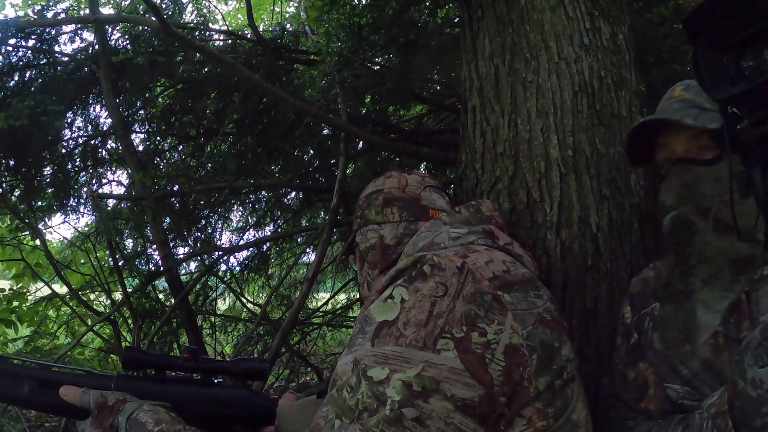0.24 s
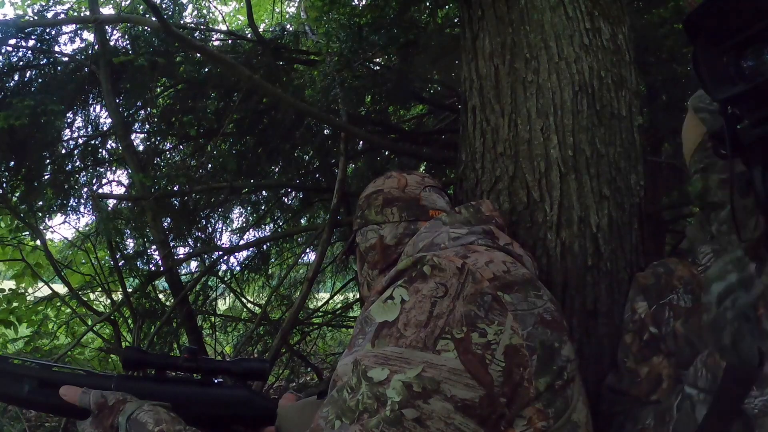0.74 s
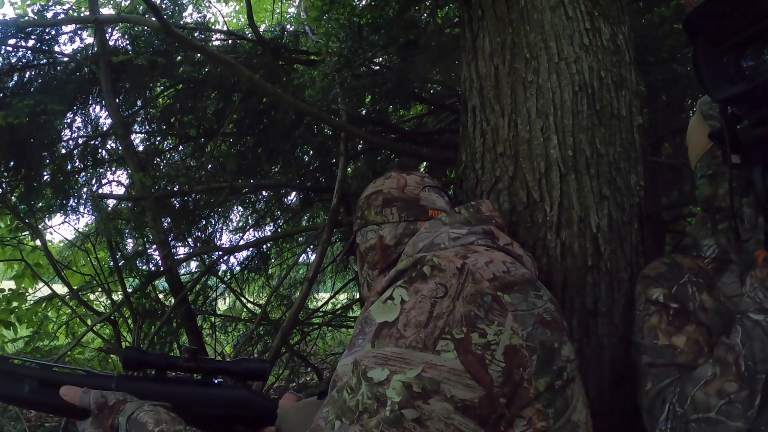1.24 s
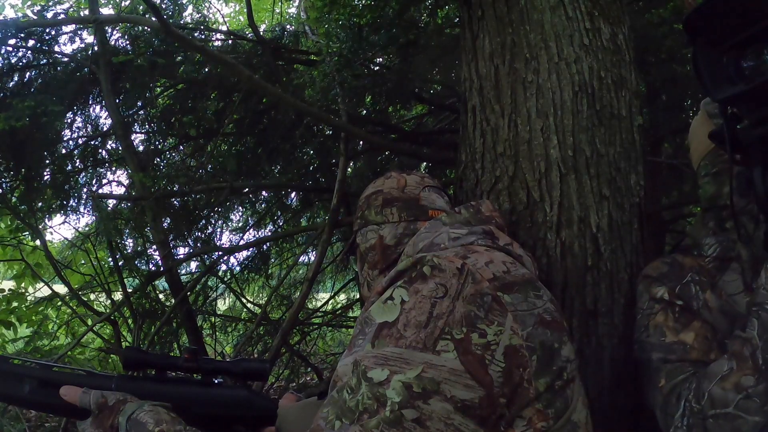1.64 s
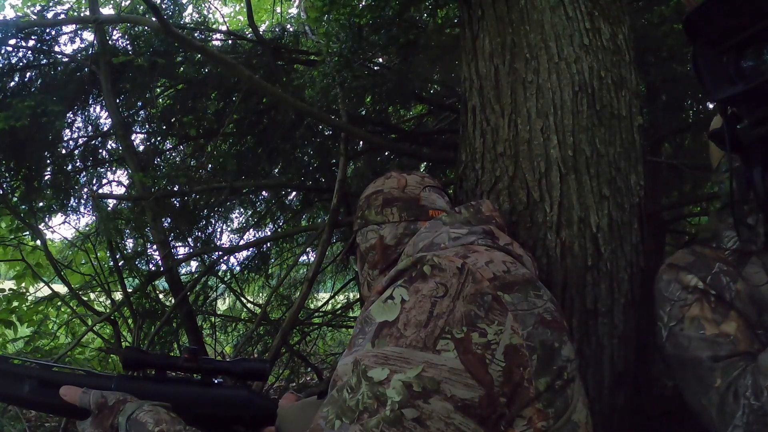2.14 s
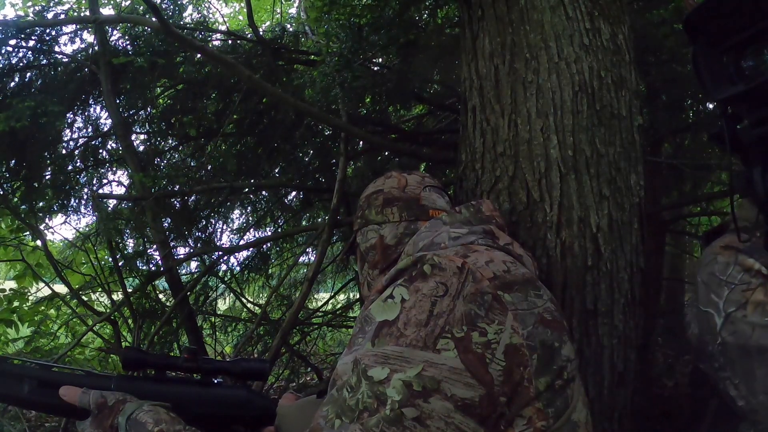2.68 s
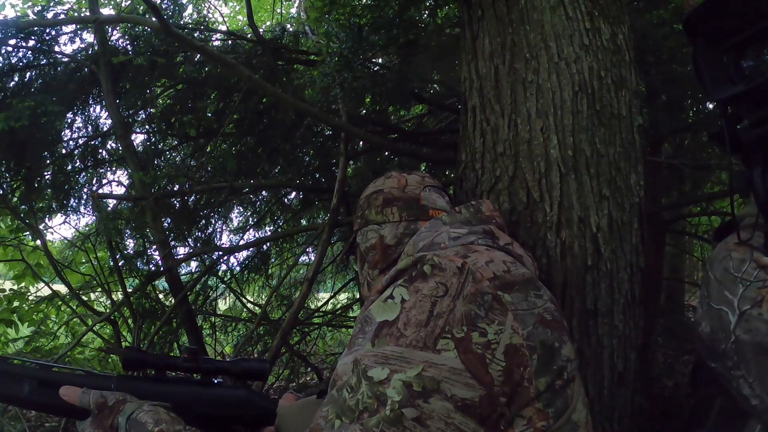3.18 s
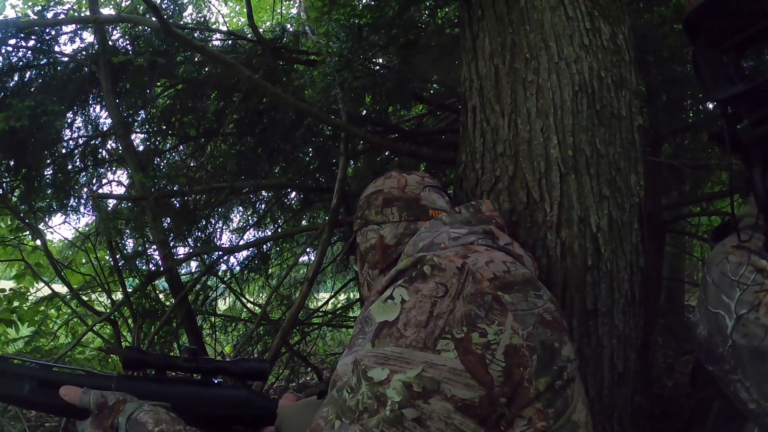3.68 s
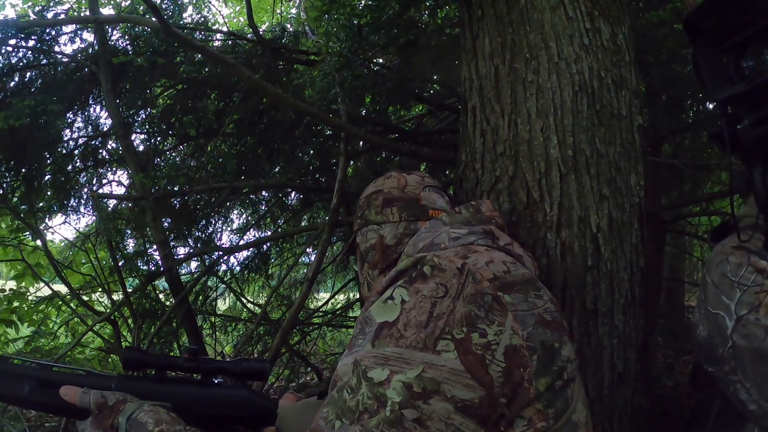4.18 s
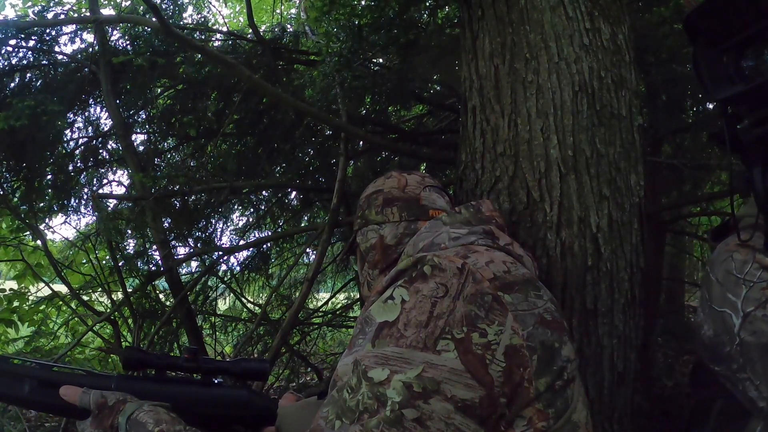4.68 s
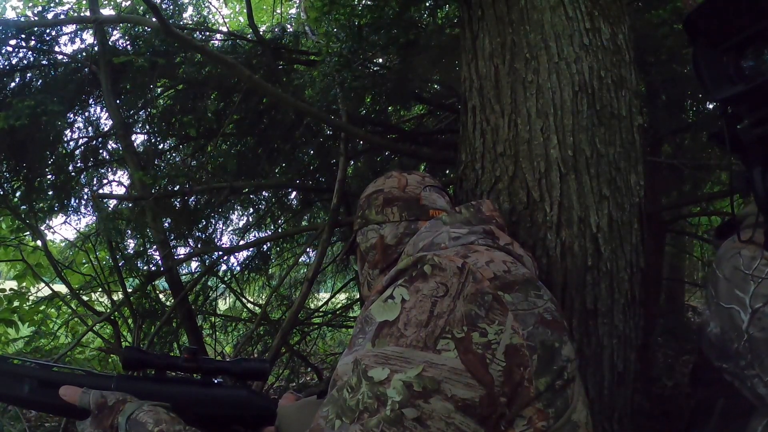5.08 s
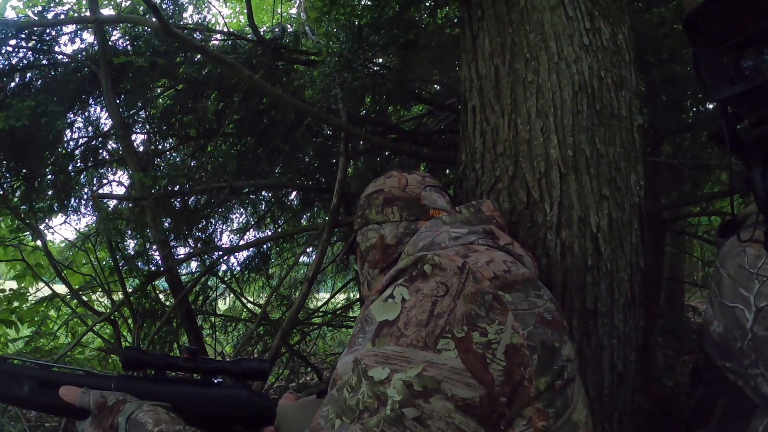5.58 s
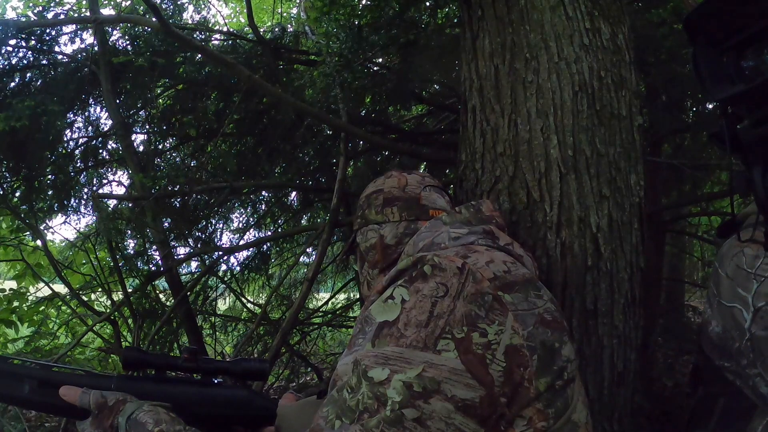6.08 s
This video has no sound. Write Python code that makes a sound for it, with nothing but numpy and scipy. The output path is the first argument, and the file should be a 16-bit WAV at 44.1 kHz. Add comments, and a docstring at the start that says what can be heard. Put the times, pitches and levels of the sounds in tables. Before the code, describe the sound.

In quiet woods with faint birdsong, a close turkey call whines, purrs, clucks four times, then gives a run of nine raspy yelps.

```python
"""Summer woods: from the start a low rumble, leaf hiss, cloth, far songbirds and puffs of wind (shaped noise, whistles).
After a second of these, a hunter close by works a reed turkey call, amid short dry ticks and clicks.
First comes a whine, then a purr, four clucks and nine yelps: the reed sings a clear line or rasps in pulses
through the mouth, and it stutters as most yelps die. Trunks return a faint echo of each call."""
import sys
import numpy as np
from scipy import signal
from scipy.fft import rfft, irfft, next_fast_len
from scipy.io import wavfile
from scipy.ndimage import uniform_filter1d, map_coordinates

SR = 44100
rng = np.random.default_rng(int(sys.argv[2]) if len(sys.argv) > 2 else 0)


def pcm_store(signal):
    """Save signal as 16-bit PCM."""
    levels = np.round(np.clip(np.atleast_2d(signal), -1, 1) * 32767)
    wavfile.write(sys.argv[1], SR, levels.astype(np.int16).T)


N = 279153
T = np.arange(N) / SR  # time [s]

# the purr, a flutter of short clear notes: (time [s], length [s], first pitch [Hz], held pitch [Hz],
# level [dB], 2nd partial [dB re level], 3rd partial [dB re level])
PURR_NOTES = [(1.363, .011, 640, 623, -19, -6.5, -20.5), (1.386, 0.026, 646, 552, -11, -6.5, -18),
              (1.433, 0.023, 609, 605, -8.5, -10, -16), (1.474, 0.03, 641, 588.6, -11, -3.5, -15.5),
              (1.522, 0.026, 634, 641, -7.5, -16, -17.5), (1.565, 0.028, 636, 675, -9, -17, -20.5),
              (1.611, 0.024, 650, 674.5, -12.5, -23, -25), (1.627, 0.029, 671, 687, -20, -17.5, -28),
              (1.666, 0.012, 768, 822, -26, -21.5, -39)]
# clucks, a clear pip over a dying rasp at half its pitch: (time [s], pip length [s], pitch [Hz],
# tone level [dB], 2nd partial [dB re tone], rasp level [dB])
CLUCK_NOTES = [(1.889, 0.014, 539, -28, 7, -21), (2.186, 0.013, 619.4, -12.5, 1, -19.5),
               (2.518, 0.018, 684, -15.5, -17, -30), (2.852, 0.019, 621, -16, 0, -24.5)]
# weak outer resonances that give the call its sheen: (centre [Hz], width [Hz], level [dB])
OUTER_RESONANCES = [(330, 200, -39), (2900, 310, -54), (3550, 450, -34), (4886, 480, -37),
                    (6530, 1800, -43.5), (10600, 2800, -89)]


def amp(db):
    """Decibels to a linear factor."""
    return 10 ** (np.asarray(db) / 20)


def unit(x):
    """Scale to rms 1."""
    return x / np.sqrt(np.mean(x ** 2) + 1e-20)


def along(points, hz):
    """Read (frequency [Hz], value) points on a log frequency axis."""
    f, v = np.transpose(points)
    return np.interp(np.log(hz + 1), np.log(f + 1), v)


def curve(points):
    """Join (time [s], value) points by straight lines over the whole scene."""
    return np.interp(T, *np.transpose(points))


def wobble(rate):
    """A smooth random curve, rate knots a second."""
    return map_coordinates(rng.standard_normal(int(N * rate / SR) + 4), [T * rate])


def note(rows, edge=.002):
    """Sample slice, soft-edged gate (edge in s) and interpolated columns of one note."""
    s, *cols = np.transpose(rows)
    part = slice(int(s[0] * SR), min(int(s[-1] * SR), N))
    t = T[part]
    gate = np.clip(np.minimum(t - s[0], s[-1] - t) / edge, 0, 1)
    return part, gate, [np.interp(t, s, c) for c in cols]


def filtered(x, response):
    """Filter x by a complex response of frequency."""
    m = next_fast_len(N + SR // 2)
    return irfft(rfft(x, m) * response(np.fft.rfftfreq(m, 1 / SR)), m)[..., :N]


def ringing(modes, f):
    """Response of steep resonances: each is applied twice, neighbours in opposite sign."""
    total = 0
    for k, (centre, width, db) in enumerate(modes):
        mode = 1j * f * width / (centre ** 2 - f ** 2 + 1j * f * width)
        total = total + (-1) ** k * amp(db) * mode ** 2
    return total


def rush(spectrum, patchy_db):
    """Stereo noise with patches of random gain over time and frequency; mid has rms 1."""
    # stereo width: (frequency [Hz], side over mid [dB])
    side_spread = [(25, -21.5), (60, -23.5), (200, -15), (800, -10), (2900, -4), (6000, -0.5), (12000, 1)]
    z = signal.stft(rng.standard_normal((2, N)), nperseg=512)[2]
    field = uniform_filter1d(rng.standard_normal(z.shape[1:]), 6, axis=0)
    field = uniform_filter1d(field, 10, axis=1)
    pair = signal.istft(z * amp(patchy_db * unit(field)), nperseg=512)[1][:, :N]

    def mid_side(hz):
        return amp(along(spectrum, hz)) * [np.ones_like(hz), amp(along(side_spread, hz))]

    mid, side = filtered(pair, mid_side)
    return np.array([mid + side, mid - side]) / np.std(mid)


def woods(x, t60, gap):
    """Trunks scatter sound into a decaying noise tail that swells over gap [s], thin in bass and treble."""
    t = np.arange(SR // 2) / SR
    tail = rng.standard_normal((2, len(t))) * amp(-60 * t / t60) * np.clip(t / gap, 0, 1) ** 2
    wet = signal.fftconvolve(x[None], tail / np.linalg.norm(tail[0]), axes=1)[:, :N]

    def tone(hz):
        low_cut = (hz / 1300) ** 2 / (1 + (hz / 1300) ** 2)
        return low_cut / (1 + (hz / 5000) ** 2)

    return filtered(wet, tone)


def air():
    """A lumpy low rumble and the hiss of leaves, both noise of slowly moving level."""
    # rumble before a 0.5 dB lift: (time [s], level [dB])
    rumble_level = [(0.0, -34.5), (0.09, -39.5), (1.57, -40), (1.73, -39), (2.11, -39), (4.58, -37.5),
                    (5.38, -41), (6.33, -43)]
    # rumble colour: (frequency [Hz], relative density [dB per Hz])
    rumble_colour = [(8, -30), (20, 2), (55, -2), (66, 4), (74, 2.5), (84, -1), (105, -10), (119, -2),
                     (133, -14), (210, -13), (330, -23), (600, -32), (1100, -120)]
    # leaf hiss dies down: (time [s], level [dB])
    hiss_level = [(0, -51.5), (3, -54), (4.6, -57.5), (6.33, -56.5)]
    # leaf colour: (frequency [Hz], relative density [dB per Hz])
    leaf_colour = [(150, -25.5), (400, 3.5), (800, -2.5), (1500, -4.5), (2500, -2), (4000, -4.5),
                   (5500, -8.5), (7800, -13), (9000, -23.5), (12500, -33), (14000, -52.5), (16000, -90)]
    rumble_db = curve(rumble_level) + 0.5 + 0.4 * wobble(15)
    rumble = amp(rumble_db) * rush(rumble_colour, patchy_db=3)
    hiss_db = curve(hiss_level) + .6 * wobble(1.5)
    return rumble + amp(hiss_db) * rush(leaf_colour, patchy_db=.8)


def rustle():
    """Cloth rubs in clumps of fine crackle: patchy noise under a restless gain."""
    # cloth rubbing: (time [s], length [s], level [dB])
    rubs = [(0, 0.594, -54), (0.962, 0.35, -41.5)]
    # cloth colour: (frequency [Hz], relative density [dB per Hz])
    cloth_colour = [(300, -33), (800, -0.5), (2000, 1), (3500, 2), (5500, -7.5), (7500, -21), (10000, -31),
                    (13000, -29.5), (16000, -73.5)]
    level = np.zeros(N)
    for s, length, db in rubs:
        part, gate, _ = note([(s,), (s + length,)], edge=0.15)
        level[part] = gate * amp(db)
    return level * amp(1.5 * wobble(60)) * rush(cloth_colour, patchy_db=2)


def birds():
    """Far songbirds: thin gliding whistles, blurred by the woods, each with its own phase between the ears."""
    # one row a note: (time [s], length [s], first pitch [Hz], middle pitch [Hz], last pitch [Hz], level [dB])
    song_notes = [(0.058, 0.19, 2700, 2046, 2210, -57.5), (0.171, .018, 3050, 3450, 3600, -41.5),
                  (0.179, 0.027, 3640, 2900, 2440, -42.5), (0.214, 0.032, 2430, 3380, 3550, -39),
                  (.24, .16, 3950, 3850, 3850, -50), (0.253, 0.053, 2630, 2360, 2330, -48),
                  (0.293, 0.059, 2400, 2900, 3620, -42), (.36, 0.17, 3400, 3346, 3340, -56.5),
                  (0.403, .2, 2280, 2200, 2110, -60.5), (.7, 0.11, 3850, 3810, 3803, -49),
                  (1.17, .13, 3820, 3930, 3840, -54), (1.3, 0.064, 3400, 3355, 3180, -45),
                  (1.341, 0.093, 3520, 3930, 4170, -50), (1.362, 0.11, 6920, 6380, 5900, -56),
                  (1.44, 0.061, 3550, 3150, 2770, -44.5), (1.53, .06, 2800, 3480, 3400, -54.5),
                  (1.574, 0.035, 2520, 2410, 2330, -47.5), (2.114, 0.22, 2920, 2920, 2890, -60.5),
                  (2.208, 0.033, 3200, 3510, 3880, -52.5), (2.368, 0.079, 2330, 3100, 3970, -49),
                  (2.68, 0.06, 3305, 3360, 2750, -45), (2.733, .065, 2820, 3027, 3330, -49),
                  (2.738, 0.072, 3140, 3740, 3850, -53.5), (2.822, 0.021, 2250, 2450, 2540, -44.5),
                  (2.856, .055, 2650, 3480, 2550, -43), (2.95, 0.06, 2610, 2550, 2535, -61),
                  (3.295, 0.032, 3600, 3560, 3400, -54), (3.328, .06, 3080, 2380, 2310, -57.5),
                  (3.376, .035, 2960, 3310, 3550, -45.5), (3.468, 0.042, 4800, 3410, 2900, -47),
                  (3.512, 0.074, 2860, 2834, 2810, -51), (3.02, 0.1, 2165, 2155, 2160, -64.5),
                  (3.769, 0.14, 2900, 3830, 3490, -49.5), (3.837, 0.17, 3810, 2750, 2477, -50.5),
                  (4.054, 0.086, 2500, 3450, 3320, -51), (4.447, 0.073, 4570, 5160, 5330, -56.5),
                  (4.694, 0.056, 5010, 5910, 5830, -62.5), (5.13, 0.038, 2780, 2830, 2930, -52.5),
                  (5.268, 0.052, 2720, 2960, 2810, -50), (5.67, 0.044, 3070, 3420, 3450, -53.5),
                  (5.885, 0.059, 3700, 2800, 3640, -51), (6.209, 0.056, 4600, 4340, 4220, -52.5),
                  (6.259, .07, 3430, 3720, 4020, -54)]
    out = np.zeros((2, N))
    flutter, waver = amp(2.4 * wobble(60)), wobble(90)
    for s, length, *hzs, db in song_notes:
        times = s + length * np.arange(3) / 2
        part, gate, (hz,) = note(list(zip(times, hzs)), edge=.007)
        glide = np.abs(np.gradient(hz)) * SR / 17000  # moving notes waver, held ones stay thin
        pitch = hz * (1 + (.001 + .04 * np.clip(glide, 0, 1)) * waver[part])
        ear_phase = [[0], [rng.normal(0, 1)]]
        whistle = np.sin(2 * np.pi * np.cumsum(pitch) / SR + ear_phase)
        out[:, part] += amp(db) * gate * flutter[part] * whistle
    return out + amp(6.5) * woods(out.mean(0), t60=.35, gap=.005)


def puffs():
    """Wind thumps the microphone ports: low noise, separate in each, swelling and falling together."""
    # (time [s], length [s], level [dB])
    gusts = [(0.062, 0.17, -37), (1.7, 0.15, -28.5), (4.03, 0.13, -31), (4.177, .18, -37.5),
             (4.381, .1, -32), (4.52, 0.26, -33.5), (4.796, 0.11, -40)]
    # thump colour: (frequency [Hz], relative density [dB per Hz])
    thump_colour = [(8, -7), (20, 2), (45, -1.5), (90, -11), (200, -34.5), (500, -120)]
    level = np.zeros(N)
    for s, length, db in gusts:
        part, gate, _ = note([(s,), (s + length,)], edge=length / 2)
        level[part] += gate * amp(db)
    return level * unit(filtered(rng.standard_normal((2, N)), lambda hz: amp(along(thump_colour, hz))))


def ticks():
    """Short dry ticks and clicks, some of them during the calls: noise dying within a few milliseconds."""
    # each dulled by its own low-pass: (time [s], peak level [dB], low-pass corner [Hz])
    clicks = [(0.97, -25, 930), (1.063, -9.5, 4730), (1.083, -39, 5000), (1.146, -14.5, 5540),
              (1.154, -20, 5000), (1.161, -41, 5560), (1.212, -18.5, 5480), (1.894, -24, 3500),
              (3.311, -32.5, 1960), (3.412, -33, 2200), (4.245, -29, 10840), (4.28, -36.5, 10060)]
    out, t = np.zeros(N), np.arange(300) / SR
    for s, db, hz in clicks:
        burst = rng.standard_normal(300) * amp(-60 * t / 0.0036)
        click = signal.lfilter(*signal.butter(4, hz, fs=SR), burst)
        out[int(s * SR):][:300] += amp(db) * click / abs(click).max()
    return out


def short(shape, s, length, first_hz, held_hz, db, second_db, third_db):
    """Rows of one short clear note that swells, holds and dies with drooping pitch."""
    swell, hold, start_db, end_db, droop = shape
    glide = (held_hz - first_hz) / (swell + hold)
    knots = [(0, first_hz, start_db), (swell, first_hz + swell * glide, 0),
             (swell + hold, held_hz, 0), (1, held_hz * (1 - droop), end_db)]
    return [(s + u * length, hz, db + d, db + second_db + d, db + third_db + d) for u, hz, d in knots]


def clear_notes():
    """All that the reed sings clear: rows (time [s], pitch [Hz], levels of three partials [dB])."""
    # the whine, one long note: (time [s], pitch [Hz], level [dB], 2nd partial [dB], 3rd partial [dB])
    whine = [(0.995, 790, -35, -56.5, -71), (1.005, 805, -21.5, -25, -44.5), (1.013, 771, -11, -31, -46.5),
             (1.029, 752.5, -38.5, -53.5, -84), (1.059, 739, -21.5, -34, -55),
             (1.083, 666, -26, -31.5, -39.5), (1.115, 661.5, -21.5, -36, -68),
             (1.147, 736.6, -21.5, -46, -61), (1.163, 743, -12.5, -31.5, -50.5),
             (1.191, 832, -16, -28, -57), (1.209, 913, -23.5, -38.5, -62.5), (1.225, 1020, -44, -88, -69)]
    # faint tone under the purr: (time [s], pitch [Hz], level [dB], 2nd partial [dB], 3rd partial [dB])
    murmur = [(1.374, 610, -30.5, -35.5, -57), (1.614, 617, -34, -39.5, -70.5)]
    # clear squeaks at and along the yelps: (time [s], length [s], first pitch [Hz], held pitch [Hz],
    # level [dB], 2nd partial [dB re level], 3rd partial [dB re level])
    squeaks = [(3.578, .021, 997, 817, -37, -7.5, -33), (3.598, 0.056, 777.7, 756.6, -21, 7, -17),
               (3.684, 0.028, 908, 1038, -23.5, -16.5, -39.5),
               (4.533, 0.029, 864, 807, -12.5, -24.5, -44.5), (5.466, 0.022, 1188, 1170, -23, -25, -56.5),
               (5.594, 0.028, 890, 1010, -21.5, -25, -47)]
    # note shapes: (swell [share of length], hold [share of length], start level [dB], end level [dB],
    # pitch lost at the end [share])
    purr_shape = (.27, .42, -11, -14, .06)
    cluck_shape = (0.17, 0.5, -19, -18.5, 0.37)
    squeak_shape = (0.23, 0.82, -10.5, -20, 0.32)
    purr = [short(purr_shape, *row) for row in PURR_NOTES]
    clucks = [short(cluck_shape, s, length, hz, hz, db, second_db, third_db=-18.5)
              for s, length, hz, db, second_db, _ in CLUCK_NOTES]
    return [whine, murmur] + purr + clucks + [short(squeak_shape, *row) for row in squeaks]


def clear():
    """A steady reed: three partials on one slightly unsteady pitch, with a trace of leaking air."""
    out, breathy = np.zeros(N), np.zeros(N)
    shake = 1 + 0.021 * wobble(150)
    for rows in clear_notes():
        part, gate, (hz, *levels) = note(rows)
        phase = 2 * np.pi * np.cumsum(hz * shake[part]) / SR
        partials = sum(amp(db) * np.sin((k + 1) * phase + k) for k, db in enumerate(levels))
        out[part] -= gate * np.sqrt(2) * partials
        breathy[part] += gate * amp(levels[1]) * (1 + np.cos(phase)) ** 2
    leak = breathy * rng.standard_normal(N)
    return out + amp(7) * filtered(leak, lambda f: ringing(OUTER_RESONANCES, f))


def yelp(s, length, release, first_hz, last_hz, db, bite_db, tire_db, chest_db, bright_db, darken_db, rough):
    """Rows of one yelp: a hoarse, flat bite, a body that shifts in pitch and level and darkens, a ragged release."""
    bite_s, settle_s = .016, .006
    release_db, release_rough = -16.5, .65
    # the bite is 5 % flat with 5 dB more chest and roughness .75
    bite = (first_hz * (1 - .05), db + bite_db, chest_db + 5, bright_db, .75)
    end = (chest_db - 6.5, bright_db + darken_db)
    end_s, end_db = s + length - release, db + tire_db
    return [(s, *bite), (s + bite_s, *bite),
            (s + bite_s + settle_s, first_hz, db, chest_db, bright_db, rough),
            (end_s - settle_s / 2, last_hz, end_db, *end, rough),
            (end_s, last_hz, end_db, *end, release_rough),
            (s + length, last_hz, end_db + release_db, *end, release_rough)]


def rasp_notes():
    """All rasps: rows (time [s], pulse rate [Hz], mouth [dB], chest [dB], brightness [dB], roughness [0-1])."""
    # the whine and the purr turn hoarse: (time [s], length [s], pulse rate [Hz], mouth [dB], brightness [dB])
    hoarse_ends = [(1.154, 0.047, 259.8, -26.5, -4), (1.603, 0.044, 330, -26, -23)]
    # yelps: (time [s], length [s], release [s], first pulse rate [Hz], last pulse rate [Hz], mouth [dB],
    # bite [dB], tiring [dB], chest [dB], brightness [dB], darkening [dB], roughness [0-1])
    yelps = [(3.598, 0.063, 0.01, 386.8, 396, -20.5, -2, -5.5, -12, 3, -4, .4),
             (3.883, 0.084, 0.015, 245.8, 229.7, -15.5, -1.5, -1.5, -5, 3, -5, .45),
             (4.224, 0.11, 0.037, 253.8, 241.7, -15, 1, -1, -6, -0.5, -8, .55),
             (4.535, 0.12, 0.049, 344.5, 336.6, -8, -6.5, -5.5, -13.5, -5, -8, 0.11),
             (4.847, 0.11, 0.026, 337.6, 311.3, -9.5, -1.5, -2.5, -15, -8.5, -11.5, 0.13),
             (5.169, 0.1, .022, 345.5, 298.6, -10.5, -1.5, -1, -12, -6, -13, .06),
             (5.486, .092, 0.015, 340, 302, -12, -0.5, 1, -8.5, -5.5, -4.5, 0.04),
             (5.798, 0.094, 0.01, 335.7, 320, -10.5, -6, -2.5, -3, -2.5, -16, 0.06),
             (6.111, 0.1, .01, 346.4, 308.4, -11.5, -4, -2, -3, -3.5, -13, .05)]
    clucks, hoarse = [], []
    for s, length, hz, _, _, db in CLUCK_NOTES:
        tail = 1.39 * length  # the rasp outlasts the pip, fading and darkening
        clucks.append([(s + u * tail, hz / 2, db - 11 * u, 2 - 9 * u, -4.5 * (1 + u), .75) for u in (0, 1)])
    for s, length, hz, db, bright_db in hoarse_ends:
        hoarse.append([(s + u * length, hz, db + u, 0, bright_db, 0.8) for u in (0, 1)])
    return clucks + hoarse + [yelp(*row) for row in yelps]


def rasp():
    """The reed slaps shut once a cycle; the rougher, the more timing and size scatter and extra slaps slip in."""
    # mouth, chest and bright bank, each of rows (centre [Hz], width [Hz], level [dB])
    mouth_banks = [
        [(1010, 312, 0)],
        [(735, 58, 0)],
        [(1383, 65, 14), (1594, 145, 6), (1963, 287, 6.5)],
    ]
    # treble of the rasp, duller on the first three yelps: (time [s], level [dB])
    treble_level = [(3.4, 0.5), (3.55, -5), (4.35, -6.5), (4.5, 1), (6.33, 1)]
    sheen_follows = 0.31  # share of the brightness dB that the outer resonances and leaking air follow
    drive, breathy = np.zeros((4, N)), np.zeros(N)
    for rows in rasp_notes():
        part, gate, (hz, mouth_db, chest_db, bright_db, rough) = note(rows)
        rough = np.clip(rough, 0, 1)
        half = np.cumsum(2 * hz / SR)  # half cycles passed
        at = np.flatnonzero(np.diff(np.floor(half + .5)))
        luck = rng.standard_normal((120, 2))[:len(at)]
        # every other slap is the extra one, silent in a smooth reed
        strong = np.arange(len(at)) % 2 == 0
        size = np.where(strong, 1, 0.82 * rough[at]) * amp(1.77 * rough[at] * luck[:, 0])
        size = size / np.sqrt(1 + rough[at] ** 2) * np.sqrt(SR / hz[at])
        # scattered slap times, split between the two nearest samples
        exact = np.interp(np.floor(half[at + 1] + .5) - .5, half, np.arange(len(hz)))
        when = np.clip(exact + 0.168 * rough[at] * luck[:, 1] * SR / hz[at], 0, len(hz) - 2)
        whole, rest = when.astype(int), when % 1
        slaps = np.bincount(whole, size * (1 - rest), len(hz))
        slaps = slaps + np.bincount(whole + 1, size * rest, len(hz))
        sheen_db = mouth_db + sheen_follows * bright_db
        drive[:, part] -= slaps * gate * amp([mouth_db, mouth_db + chest_db, mouth_db + bright_db, sheen_db])
        # air leaks past once a cycle
        breathy[part] += gate * amp(sheen_db) * (.5 + rough) * (1 + np.cos(np.pi * half))
    grid = np.fft.rfftfreq(8192, 1 / SR)

    def banks(f):
        return np.array([ringing(m, f) / np.sqrt(np.mean(abs(ringing(m, grid)) ** 2)) for m in mouth_banks])

    voiced = filtered(drive[:3], banks).sum(0)
    voiced = signal.sosfilt(signal.butter(6, [520, 2280], "band", fs=SR, output="sos"), voiced)
    leak = .1 * breathy * rng.standard_normal(N)
    treble = (drive[3] + leak) * amp(curve(treble_level))
    return voiced + amp(23) * filtered(treble, lambda f: ringing(OUTER_RESONANCES, f))


def pip(out_s, hz, length):
    """Start sample, envelope and phase of a short tone that swells fast and dies."""
    t = np.arange(int(length * SR)) / SR
    return int(out_s * SR), np.sin(np.pi * (t / length) ** .65) ** 2, 2 * np.pi * hz * t


def slips():
    """Lone slips and catches of the reed ring the mouth for a few cycles."""
    # the reed catching, mostly just before a note: (time [s], level [dB], pitch [Hz], length [s])
    catches = [(1.326, -33, 1250, .005), (1.879, -36, 1100, .01), (1.912, -33, 650, .02),
               (2.213, -33, 1250, .012), (3.551, -34, 1100, .006), (3.855, -37, 1900, .006),
               (4.201, -33, 1900, .008), (4.218, -36, 900, .012), (4.518, -37, 1000, .014),
               (4.828, -36, 1900, .004), (4.834, -38, 1000, .013), (5.155, -40, 1000, .014),
               (5.775, -32, 1200, .008), (6.088, -39, 1200, .004)]
    # slips as five inner purr notes start: (level [dB])
    purr_slip_db = (-16, -11, -12.5, -10.5, -10)
    # single slips as a call dies: (time [s], level [dB], pitch [Hz], near-octave overtone [dB], length [s])
    dying_slips = [(2.194, -23, 1100, -12, 0.014), (2.527, -9, 1059, -26, 0.0079),
                   (3.667, -8.5, 1130, -30, 0.0091), (3.675, -11.5, 1006, -4.5, 0.011),
                   (3.964, -5.5, 1216, -27.5, 0.0023), (3.973, -11.5, 1020, -3, 0.0053),
                   (3.98, -10, 1156, -21, 0.0055), (3.986, -14, 950, -7, 0.011),
                   (3.992, -24.5, 1034, -7, 0.01), (4.948, -11.5, 1010, -29, 0.0063),
                   (4.965, -21, 1020, -27, 0.012), (5.277, -18, 990, -17.5, .007),
                   (5.284, -16.5, 990, -26, .009), (5.291, -28.5, 929, -18.5, 0.012),
                   (5.585, -12.5, 906, -11, 0.0062), (5.894, -10.5, 920, -20, .009),
                   (5.906, -12.5, 910, -30, 0.0097), (5.916, -12, 1020, -30, 0.0078),
                   (5.926, -14.5, 987, -28, 0.023), (6.201, -6, 990, -30, 0.0036),
                   (6.211, -10.5, 946, -24, 0.0063), (6.218, -8.5, 1037, -24, 0.0087),
                   (6.237, -15.5, 907, -23, 0.011), (6.243, -21, 977, -26, 0.023)]
    out = np.zeros(N + SR)
    purr_slips = [(row[0], db, 1020, -25, 0.0084) for row, db in zip(PURR_NOTES[2:], purr_slip_db)]
    for s, db, hz, octave_db, length in purr_slips + dying_slips:
        i, shape, phase = pip(s, hz, length)
        tone = np.sin(phase) + amp(octave_db) * np.sin(1.837 * phase) + 0.48 * np.sin(0.898 * phase)
        out[i:i + len(shape)] += amp(db) * shape * tone
    for s, db, hz, length in catches:
        i, shape, phase = pip(s, hz, length)
        out[i:i + len(shape)] += amp(db) * shape * (np.sin(phase) + 0.17 * np.sin(0.56 * phase + 1))
    return out[:N]


def to_the_right(x):
    """Places a close sound to the right: the right ear hears it louder and 3.2 samples sooner."""
    lag = 3.2 / SR
    side = np.array([[1], [-1]])
    return filtered(x, lambda hz: amp([[-1.9], [1.6]]) * np.exp(-1j * np.pi * hz * lag * side))


def scene():
    """The call and ticks on the right, their woodland bed, and the echo of the call."""
    bed = air() + rustle() + birds() + puffs()
    near_ticks = ticks()
    call = clear() + rasp() + slips()
    echo = amp(-19) * woods(call, t60=.1, gap=.008)  # near trunks
    echo = echo + amp(-19.5) * woods(call, t60=0.46, gap=0.023)  # far trees
    return bed + to_the_right(call + near_ticks) + echo


def record(dry):
    """Peaks round off near full scale; nothing passes above the band limit."""
    held = dry / (1 + abs(dry / 0.93) ** 6) ** (1 / 6)
    return filtered(held, lambda hz: hz < 15200)


dry = scene()
out = record(dry)
pcm_store(out)
```